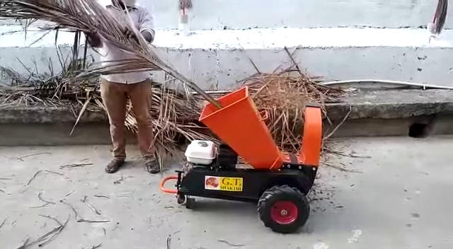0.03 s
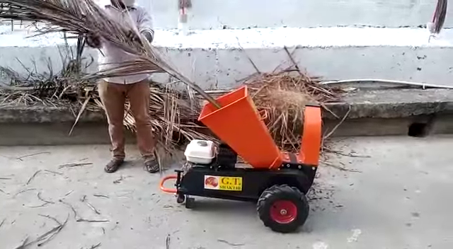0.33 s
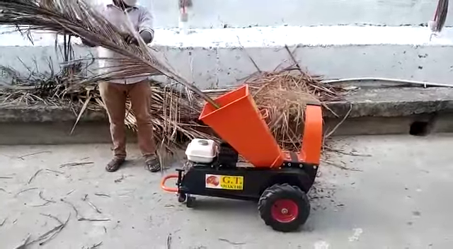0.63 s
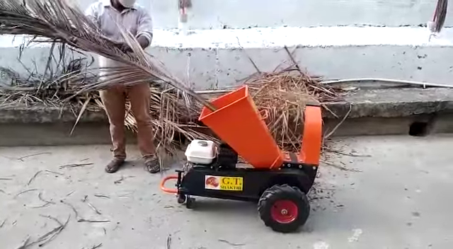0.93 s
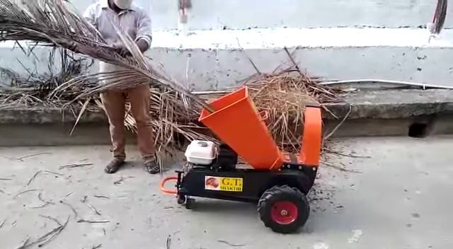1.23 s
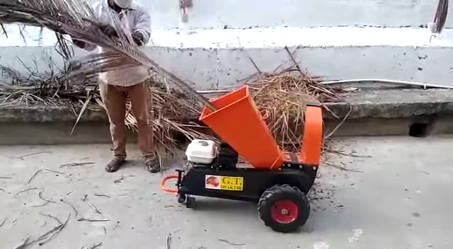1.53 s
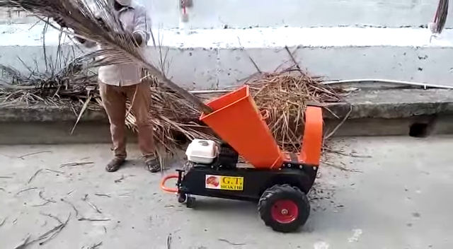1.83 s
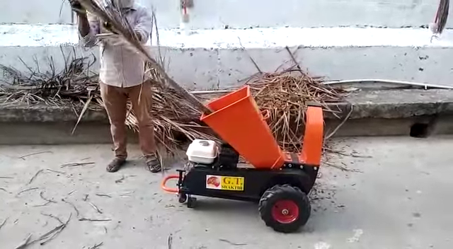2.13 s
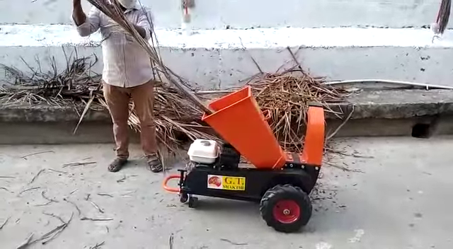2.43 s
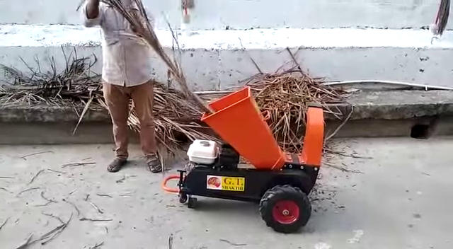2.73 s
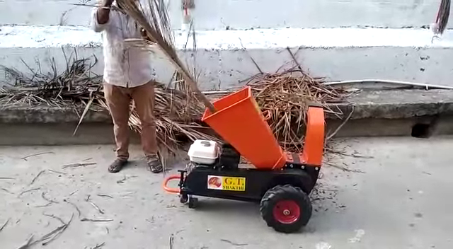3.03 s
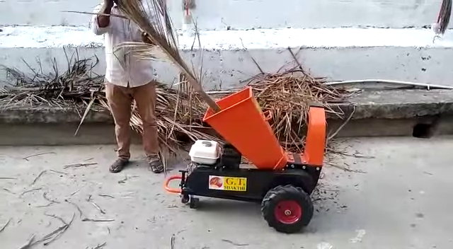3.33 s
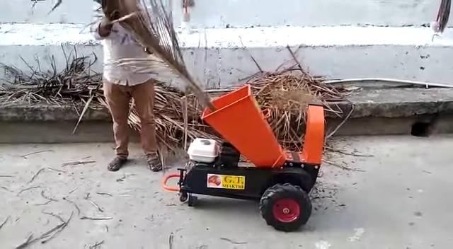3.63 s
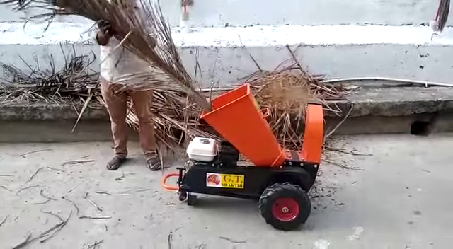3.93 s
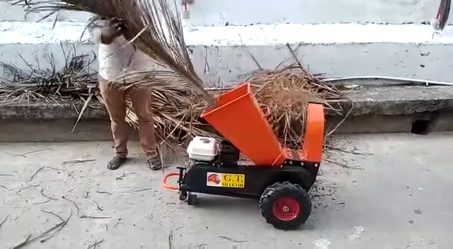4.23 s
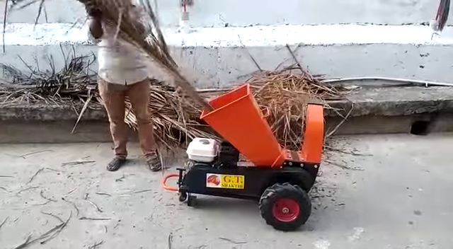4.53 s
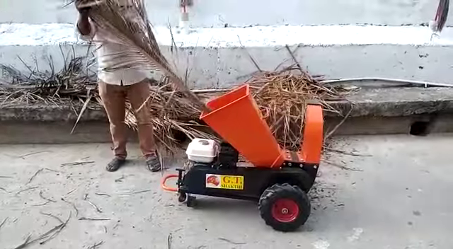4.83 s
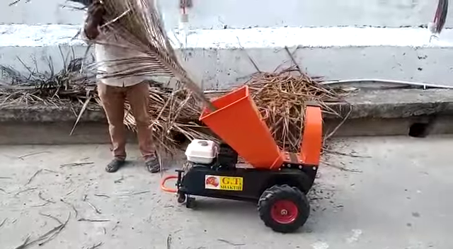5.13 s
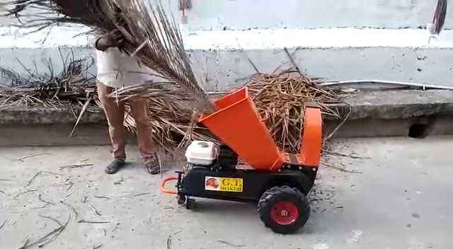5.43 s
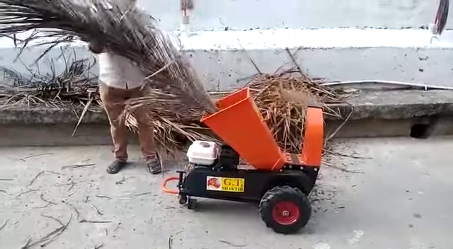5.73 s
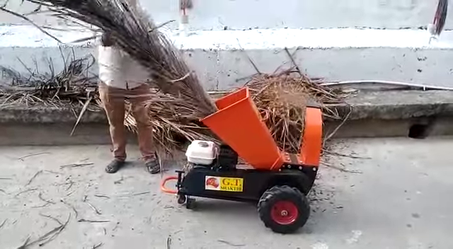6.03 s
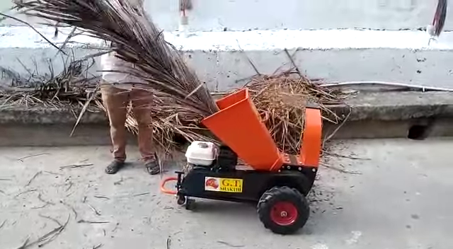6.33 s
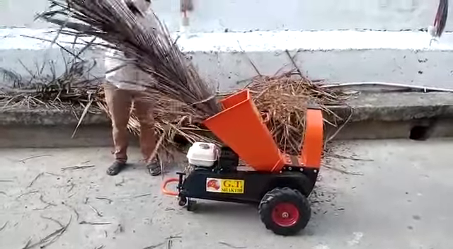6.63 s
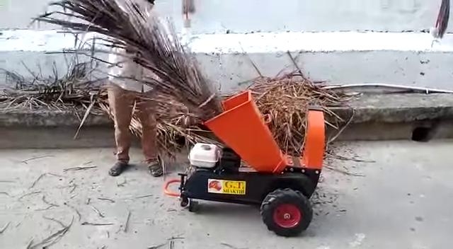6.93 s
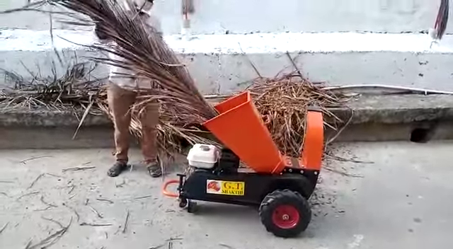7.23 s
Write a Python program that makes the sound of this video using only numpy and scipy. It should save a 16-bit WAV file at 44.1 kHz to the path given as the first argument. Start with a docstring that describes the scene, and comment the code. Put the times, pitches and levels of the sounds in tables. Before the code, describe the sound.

Dry palm fronds are shredded outdoors by a nearby petrol chipper, with a slight echo off a wall. First a thick stalk buzzes and rings under the knives over the thudding exhaust. The engine regains speed with a faint whine, and stalks crack sharply. Twice the load then slows it nearly to a stall, with booming separate beats, crackling leaves and rattling chips, and each time it picks up again.

```python
"""A small petrol chipper shreds dry palm fronds in a concrete yard.
Its one cylinder thumps through the muffler and, with the throttle open, barks; a belt drives the drum.
The drum's knives chop thick stalks with a buzz; stalks ring and snap, leaves crackle through and chips
rattle the steel housing. Twice the load nearly stalls the engine. A wall returns a short echo."""
import sys
import numpy as np
from scipy import signal
from scipy.fft import rfft, irfft
from scipy.io import wavfile
from scipy.ndimage import uniform_filter1d

SR = 44100
rng = np.random.default_rng(int(sys.argv[2]) if len(sys.argv) > 2 else 0)


def to_wav(s):
    """Save 16-bit WAV."""
    ch = np.atleast_2d(s).T  # columns
    pcm = np.round(np.clip(ch, -1, 1) * 32767)  # PCM
    wavfile.write(sys.argv[1], SR, pcm.astype(np.int16))


N = 330750
TIME = np.arange(N) / SR
FREE_FIRING_HZ = 28

# Engine speed. Each row: time in seconds, firing rate in Hz.
FIRING_HZ = [(0, 27.2), (.12, 26.6), (.2, 24.55), (.29, 23.85), (.72, 25.75), (.89, 25.87), (1.03, 25.3),
             (1.2, 25.35), (1.42, 25.65), (1.7, 27.5), (1.95, 27.95), (2.78, 27.99), (3.05, 26.72),
             (3.25, 26.65), (3.44, 26.2), (3.52, 24.7), (3.8, 17.65), (3.98, 15.84), (4.45, 15.43),
             (5.01, 23.97), (5.44, 27.89), (5.63, 23.71), (5.94, 19.3), (6.89, 12.53), (7.5, 21.4)]
# Spectra of rushing gas, churning chips and dry leaves. Each row: frequency in Hz, gain in dB.
GAS_SPECTRUM = [(150, -25), (800, 3), (1400, 1), (2100, -1), (2950, 3), (3600, -6), (5200, -9), (7200, -6),
                (10000, -7), (13000, -17)]
CHURN_SPECTRUM = [(200, -37.5), (450, -9.5), (560, -5.5), (850, -0.5), (1150, -5.5), (1500, -6),
                  (2800, -11.5), (3500, -47), (14000, -33)]
LEAF_SPECTRUM = [(500, -24), (1500, 1.5), (2700, 0.5), (4000, -5.5), (9500, -5.5), (13000, -16)]


def amp(db):
    """Decibels to gain."""
    return np.exp(np.asarray(db) * (np.log(10) / 20))


def unit(x):
    """Scales to rms 1."""
    return x / np.sqrt(np.mean(x ** 2) + 1e-20)


def lookup(table, at=TIME):
    """Interpolates a two-column table, by default over time."""
    return np.interp(at, *np.transpose(table))


def log_lookup(table, hz):
    """Interpolates a spectrum over log frequency."""
    points_hz, values = np.transpose(table)
    return np.interp(np.log(hz + 1), np.log(points_hz), values)


def ring(x, spectrum, size=8192):
    """Minimum-phase filter of energy 1: a body that rings after it is driven."""
    log_gain = np.log(amp(log_lookup(spectrum, abs(np.fft.fftfreq(size, 1 / SR)))))
    response = np.fft.ifft(np.exp(np.conj(signal.hilbert(log_gain)))).real[:size // 2]
    return signal.oaconvolve(x, response / np.linalg.norm(response))[:N]


def resonate(x, hz, width_hz):
    """Steep resonance that follows the pitch hz."""
    carrier = np.exp(2j * np.pi * np.cumsum(hz * np.ones(len(x))) / SR)
    r = np.exp(-np.pi * width_hz / SR)
    return 2 * (carrier * signal.lfilter([(1 - r) ** 2], [1, -2 * r, r * r], x / carrier + 1e-18)).real


def steady(x, size=11025):
    """Holds the slow level at rms 1 and keeps the pulses."""
    return x / np.sqrt(abs(uniform_filter1d(uniform_filter1d(x ** 2, size), size)) + 1e-12)


def drift(hz):
    """Random wander of rms 1, low-passed at hz."""
    t = TIME[::100]
    rolloff = 1 + (np.fft.rfftfreq(len(t), t[1]) / hz) ** 4
    slow = irfft(rfft(rng.standard_normal(len(t))) / rolloff, len(t))
    return np.interp(TIME, t, unit(slow))


def beats(turns, spread_db, jitter_s):
    """One slightly uneven impulse per whole turn."""
    at = np.flatnonzero(np.diff(np.floor(turns)) > 0)
    size, late = rng.standard_normal((len(at), 2)).T
    at = np.clip(at + np.round(late * jitter_s * SR).astype(int), 0, N - 1)
    return np.bincount(at, amp(spread_db * size), N)


def earlier(x, lead_s):
    """Time advance; a negative lead delays."""
    return np.interp(TIME + lead_s, TIME, x, right=0)


def fading(impulses, decay_s):
    """Each impulse starts an exponential decay."""
    return signal.lfilter([1], [1, -np.exp(-1 / (decay_s * SR))], impulses + 1e-20)


def grit(per_s, spread_db):
    """Random fibre fractures, a few of them large."""
    size = amp(spread_db * np.minimum(rng.exponential(1, N), 4))
    return unit(size * rng.standard_normal(N) * (rng.random(N) < per_s / SR))


def wall_echo(x):
    """The yard wall returns the machine a little later."""
    return earlier(x, lead_s=-0.00525)


def boom(firings):
    """At low revs the slow, full gas pulses make the muffler boom."""
    # Each row: frequency in Hz, gain in dB.
    muffler_note = [(55, -20.5), (80, 0.5), (105, 6.5), (140, 0), (400, -30.5)]
    lugging = np.interp(lookup(FIRING_HZ), [20, 26], [1, 0])
    return amp(-41) * lugging * steady(ring(firings, muffler_note))


def whine(cycle):
    """Frame, fan and drum sing near full speed."""
    # Each row: multiple of the firing rate, relative level in dB.
    partials = [(5.3, -41), (10.6, -37), (12, -30), (13.3, -35), (15, -38), (18.55, -37), (21, -42),
                (27, -39), (32, -39), (33, -38), (35, -32)]
    speed_db = np.interp(lookup(FIRING_HZ), [22, 27, 27.9], [-35, -11, 0])
    tones = sum(amp(db) * np.sin(2 * np.pi * (k * cycle + rng.random())) for k, db in partials)
    return amp(speed_db + 1) * tones


def thump(cycle):
    """The muffler rings at each firing."""
    # Each row: time in seconds, relative level in dB.
    level_db = [(0, -37), (.3, -41), (1.5, -34.5), (2.0, -30.5), (2.75, -29.5), (3.5, -37), (4.0, -42),
                (4.7, -43.5), (5.3, -35.5), (5.6, -41), (6.3, -44), (7.0, -44), (7.5, -36.5)]
    # Each row: frequency in Hz, gain in dB.
    muffler_spectrum = [(30, -46.5), (54, -3), (78, -18.5), (108, -0.5), (140, 5.5), (170, 3.5),
                        (205, -6.5), (254, 6), (290, -23.5), (335, -9.5), (600, -16.5), (950, -4.5),
                        (3000, -68)]
    pulses = earlier(beats(cycle, spread_db=-0.4, jitter_s=0.00003), lead_s=0.00469)
    return -amp(lookup(level_db) + 3.5) * steady(ring(pulses, muffler_spectrum))


def exhaust_pulses(cycle):
    """The exhaust valve opens once a cycle, never quite alike; a few firings crack harder."""
    # Each row: time in seconds, boost in dB.
    hard_firings = [(4.93, 2), (4.973, 5.5), (5.058, 2.5), (5.138, 3.5), (7.06, 3), (7.497, 4)]
    boost_db = sum(db * (abs(TIME - at_s) < 0.02) for at_s, db in hard_firings)
    return beats(cycle, spread_db=1, jitter_s=0.0002) * amp(boost_db)


def throttle_db(lag_s=0.063, pull_db=6, full_pull_hz_per_s=23.7):
    """The bark grows as the governor, a little late, answers a sag, and as the drum is spun back up."""
    # Each row: firing rate in Hz, relative bark level in dB.
    governor = [(16, -35), (23, -36.5), (25.3, -35.5), (27, -44)]
    firing_hz = lookup(FIRING_HZ)
    sensed_hz = np.interp(TIME - lag_s, TIME, firing_hz)
    rise_hz_per_s = uniform_filter1d(np.gradient(firing_hz) * SR, size=4410)
    pull = np.clip(firing_hz / FREE_FIRING_HZ * rise_hz_per_s / full_pull_hz_per_s, 0, 1)
    return lookup(governor, sensed_hz) + pull_db * pull


def valve_clack(firings, vary_db=3):
    """The metal around the exhaust valve rings; each firing favours other notes."""
    # Each row: frequency in Hz, width in Hz, relative level in dB.
    modes = [(2300, 190, 4), (2920, 280, 3), (7100, 130, -6), (9570, 760, -2)]
    tap = earlier(fading(firings, decay_s=0.0054), lead_s=0.0035) * rng.standard_normal(N)
    clack = np.zeros(N)
    for hz, width_hz, db in modes:
        note = signal.lfilter(*signal.iirpeak(hz, hz / width_hz, fs=SR), tap)
        clack += amp(db + vary_db * drift(hz=12)) * np.sqrt(SR / np.pi / width_hz) * note
    return clack


def bark(firings):
    """The valve cracks open with a pop and a clack, and gas rushes for a few ms."""
    t = TIME[:SR // 20]
    opening = np.exp(-(t / 0.0074) ** 4) * np.minimum(t / 0.00063, 1)
    yard_tail = 0.33 * np.exp(-t / 0.031)
    rush_env = earlier(signal.oaconvolve(firings, opening + yard_tail)[:N], lead_s=0.0054)
    rush = ring(rush_env * rng.standard_normal(N), GAS_SPECTRUM)
    pop_env = earlier(fading(firings, decay_s=0.003), lead_s=0.0066)
    pop = ring(pop_env * rng.standard_normal(N), CHURN_SPECTRUM)
    clack = valve_clack(firings)
    # A bright crack just after the gas starts rushing, growing as firing strength squared.
    crack_env = earlier(fading(firings ** 2, decay_s=0.0016), lead_s=0.003)
    crack = ring(crack_env * np.diff(rng.standard_normal(N + 1)), LEAF_SPECTRUM)
    return amp(throttle_db()) * (amp(3) * rush + amp(10) * pop + amp(1) * clack + amp(7.5) * crack)


def feed(grip_s=0.015, clear_s=0.11):
    """Frond pieces are gripped, cut and cleared; returns cutting dB, crackle dB, clean-chop share."""
    # Each row: start and end in seconds, cutting and crackle in dB at full speed, clean share 0-1.
    pieces = [(0, 0, -21, -35, 0.1), (0.114, 0.188, -23, -36.5, 0), (0.125, 1.405, -17.5, -43.5, 0.61),
              (0.71, 0.94, -23.5, -52, 0.83), (0.868, 0.956, -19.5, -43, 0.53),
              (1.94, 2.8, -29.5, -48, 0.04), (2.796, 2.873, -24, -40, 0.17), (2.845, 3.513, -20, -38, 0.56),
              (3.094, 3.19, -22.5, -43, 0.5), (3.373, 3.78, -25, -35, 0), (3.583, 4.38, -28.5, -33.5, 0.11),
              (5.457, 5.554, -48, -33.5, 0.3), (5.48, 6.882, -27, -33, 0.11)]
    cut_power, leaf_power, clean_power = amp(-30) ** 2, amp(-46) ** 2, 0  # empty drum
    t = TIME[::64]
    for start_s, end_s, cut_db, leaf_db, share in pieces:
        inside = np.clip((t - start_s) / grip_s, 0, 1) * np.exp(-np.maximum(t - end_s, 0) / clear_s)
        power = (amp(cut_db) * inside) ** 2
        cut_power += power
        leaf_power += (amp(leaf_db) * inside) ** 2
        clean_power += share * power
    octaves = np.log2(lookup(FIRING_HZ) / FREE_FIRING_HZ)  # slower knives are quieter
    cut_db = np.interp(TIME, t, 10 * np.log10(cut_power)) + 5 * octaves
    leaf_db = np.interp(TIME, t, 10 * np.log10(leaf_power)) + 6 * octaves
    return cut_db, leaf_db, np.interp(TIME, t, clean_power / cut_power)


def panels(chips, flex=0.012):
    """Flying chips ring the steel panels, whose notes waver as the sheet flexes."""
    # Each row: frequency in Hz, relative level in dB.
    modes = [(268, 6.5), (335, -1), (378, 2.5), (458, 1.5), (680, 0.5), (780, 4), (895, 3.5)]
    notes = (amp(db) * resonate(chips, hz * (1 + flex * drift(hz=4.2)), width_hz=17) for hz, db in modes)
    return steady(sum(notes))


def leaves():
    """Dry leaves break in bunches; bushy tips swish in the hopper mouth."""
    # Each row: time in seconds, relative swish gain.
    tip_gain = [(5.45, 0.032), (6.2, 0.62), (6.9, 0.68)]
    bunches = fading(rng.exponential(1, N) * (rng.random(N) < 90 / SR), decay_s=0.005)
    crackle = steady(ring(grit(per_s=12000, spread_db=0.5) * (1 + 0.21 * bunches), LEAF_SPECTRUM))
    swish = ring(grit(per_s=2600, spread_db=5.5), [(3700, -58), (4700, 10), (5500, 8), (7000, -61)])
    return amp(7.5) * crackle + amp(3.5) * lookup(tip_gain) * swish


def shredding(blows, firings):
    """Chips and leaves rattle out behind the knives while the drum housing rumbles."""
    # Near a stall each power stroke jerks the drum. Each row: firing rate in Hz, relative depth.
    jerk_depth = [(13, 1.3), (20, 2.3), (27, 0.1)]
    # Each row: frequency in Hz, gain in dB.
    housing_spectrum = [(60, -35.5), (130, -11), (210, -9), (268, -0.5), (315, -6), (400, -11.5),
                        (1500, -51.5)]
    cut_db, leaf_db, clean = feed()
    bite = clean * fading(blows, decay_s=0.004)
    jerk = lookup(jerk_depth, lookup(FIRING_HZ)) * earlier(fading(firings, decay_s=0.011), lead_s=0.008)
    churn = steady(ring(grit(per_s=5000, spread_db=1) * (1 + bite + jerk), CHURN_SPECTRUM))
    foliage = amp(leaf_db) * leaves()
    rumble = amp(-4) * unit(ring(rng.standard_normal(N), housing_spectrum))
    clang = amp(-3.5) * panels(grit(per_s=900, spread_db=1.5) * (1 + jerk))
    loose = amp(cut_db) * (1 - clean) ** 1.2  # a solid stalk in the throat mutes loose chips
    return loose * (churn + clang + rumble) + foliage


def snaps(swell_s=0.0016):
    """Thick stalks break, each with a pitched knock and a spray of splinters."""
    # Each row: time in seconds, knock level in dB, knock pitch in Hz, splinter level in dB.
    breaks = [(.307, -18, 800, -29), (1.995, -14, 910, -46), (2.438, -16, 900, -42),
              (2.747, -15.5, 850, -44), (3.0985, -7, 800, -34), (3.185, -7, 740, -36),
              (3.625, -16, 1240, -36), (6.914, -19, 1690, -21)]
    t = TIME[:SR // 20]
    knock_env = t / swell_s * np.exp(1 - t / swell_s)
    knocks, splinters = np.zeros((2, N))
    for at_s, knock_db, hz, splinter_db in breaks:
        at = round(at_s * SR)
        knocks[at:at + len(t)] += amp(knock_db) * knock_env * np.sin(2 * np.pi * hz * t)
        splinters[at] += amp(splinter_db)
    spray = fading(splinters, decay_s=0.022) * rng.standard_normal(N)
    return knocks + ring(spray, GAS_SPECTRUM)


def howls(blows):
    """A thick stalk rings under the knives, gliding as it is drawn in, rough where it tears."""
    # Each row: start and end in seconds, first and last pitch in Hz, level in dB, roughness 0-1.
    stalks = [(0.134, 0.346, 690, 655, -17.5, 0.14), (0.138, 0.362, 1010, 920, -27, 0.4),
              (0.87, 1.03, 268, 262, -27, 0), (2.802, 2.912, 774, 785, -21, 0.4),
              (3.067, 3.33, 700, 717, -23, 0.02), (3.15, 3.503, 850, 765, -27, 0.1),
              (3.407, 3.617, 950, 1310, -27.5, 0.4), (6.636, 6.904, 497, 424, -31, 0.9),
              (6.58, 6.876, 870, 776, -32, 0.8)]
    out, blows = np.zeros(N), earlier(blows, lead_s=-0.001)
    for start_s, end_s, from_hz, to_hz, db, rough in stalks:
        part = slice(round(start_s * SR), round(end_s * SR))
        progress = np.linspace(0, 1, len(out[part]))
        drive = np.sqrt(1 - rough) * unit(blows[part]) + np.sqrt(rough) * rng.standard_normal(N)[part]
        note = unit(resonate(drive, from_hz + (to_hz - from_hz) * progress, width_hz=140))
        out[part] += amp(db) * np.sqrt(abs(np.sin(np.pi * progress))) * note
    return out


def chop(blows, round_trips_s=(0.0037, 0.0059), wall_return=0.54):
    """Knives strike the stalk and ring the hopper: a growl in a light cut, single blows in a deep one."""
    # Each row: frequency in Hz, gain in dB.
    chop_spectrum = [(100, -35), (265, 4), (335, 7), (400, 12.5), (465, 1), (535, 5), (600, 7), (670, 9),
                     (860, 11), (920, -5.5), (990, 6.5), (1120, -7.5), (1320, 5), (1480, -7), (1900, -3.5),
                     (6000, -46.5)]
    # Blows against hopper echoes. Each row: cutting level in dB, direct share 0-1.
    direct_share = [(-17.5, 0), (-15.5, 1)]
    cut_db, _, clean = feed()
    direct = ring(blows, chop_spectrum)
    delays = np.exp(-2j * np.pi * np.outer(round_trips_s, np.fft.rfftfreq(N, 1 / SR)))
    allpass = np.prod((wall_return + delays) / (1 + wall_return * delays), axis=0)
    echoes = irfft(rfft(direct) * allpass, N)
    depth = lookup(direct_share, cut_db)
    buzz = steady(depth * direct + (1 - depth) * echoes, size=4410)
    knots_db = 0.8 * drift(hz=6)  # knots in the stalk swell and sag the buzz
    return amp(cut_db - 1.6 + knots_db) * np.sqrt(clean) * buzz


def stereo(common, apart, period_hz=2100):
    """Left and right share the bass; above 1 kHz they swing in and out of step with frequency."""
    # Each row: frequency in Hz, depth of left-right likeness 0-1.
    likeness = [(130, .9), (500, .96), (900, .97), (2100, .9), (4200, .97), (6300, .8), (11000, .15)]
    # Each row: frequency in Hz, left minus right in dB.
    balance_db = [(100, 1.5), (180, -3), (310, 1.3), (530, -3.5), (920, -0.4), (1590, 2.0), (2750, -3.5),
                  (4740, 0), (8190, 2.5), (14200, 1)]
    hz = np.fft.rfftfreq(N, 1 / SR)
    swing = np.where(hz < period_hz / 2, 1, -np.cos(2 * np.pi * hz / period_hz))
    coherence = log_lookup(likeness, hz) * swing
    mid = rfft(common) * np.sqrt((1 + coherence) / 2)
    side = rfft(apart) * np.sqrt((1 - coherence) / 2)
    tilt_db = log_lookup(balance_db, hz) / 2
    return np.array([irfft((mid + sign * side) * amp(sign * tilt_db), N) for sign in (1, -1)])


def scene():
    """One engine cycle times the exhaust and the belt-driven knives."""
    knives_per_firing = 2.615
    cycle = np.cumsum(lookup(FIRING_HZ)) / SR - 0.9
    firings = exhaust_pulses(cycle)
    blows = beats(cycle * knives_per_firing, spread_db=0.8, jitter_s=0.00002)
    tones = thump(cycle) + whine(cycle) + boom(firings) + chop(blows) + howls(blows)
    common = tones + bark(firings) + shredding(blows, firings) + snaps()
    # The echo and independent noise set the two sides apart.
    apart = wall_echo(tones) + bark(firings) + shredding(blows, firings) + snaps()
    return stereo(common, apart)


def record(dry):
    """Low-pass at 14.45 kHz."""
    lowpass = signal.firwin(401, 14450, window=("kaiser", 9), fs=SR)
    return signal.oaconvolve(dry, lowpass[None], "same")


dry = scene()
out = record(dry)
to_wav(out)
```